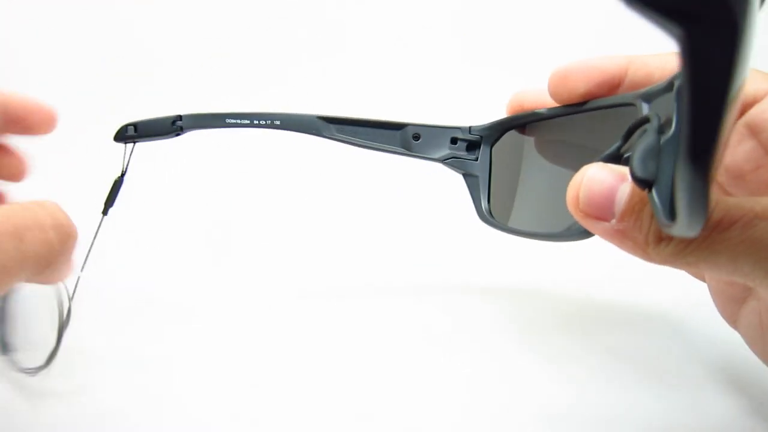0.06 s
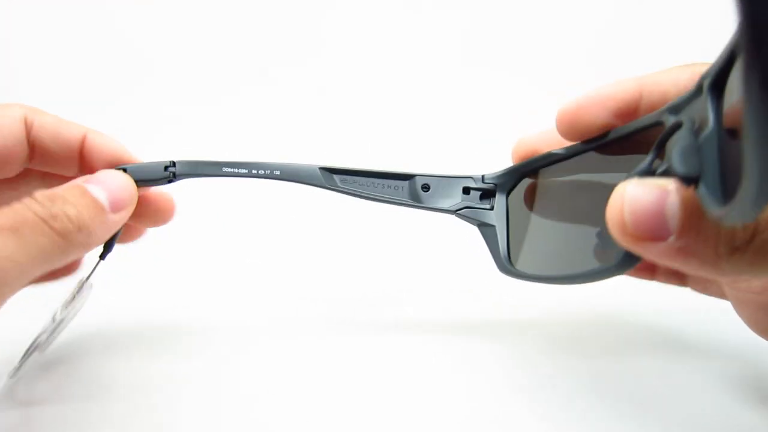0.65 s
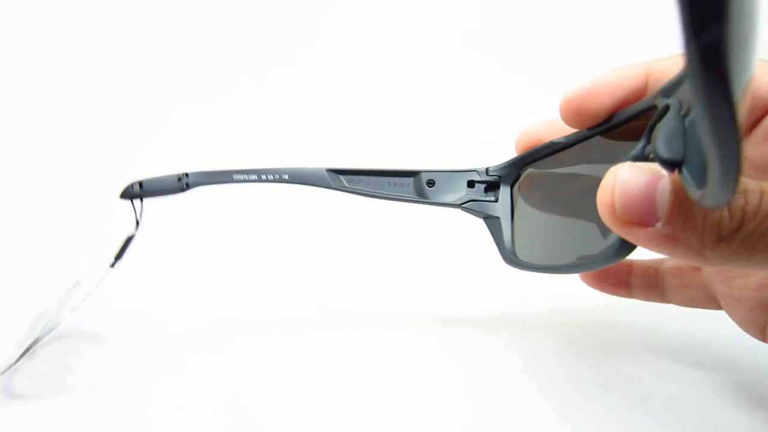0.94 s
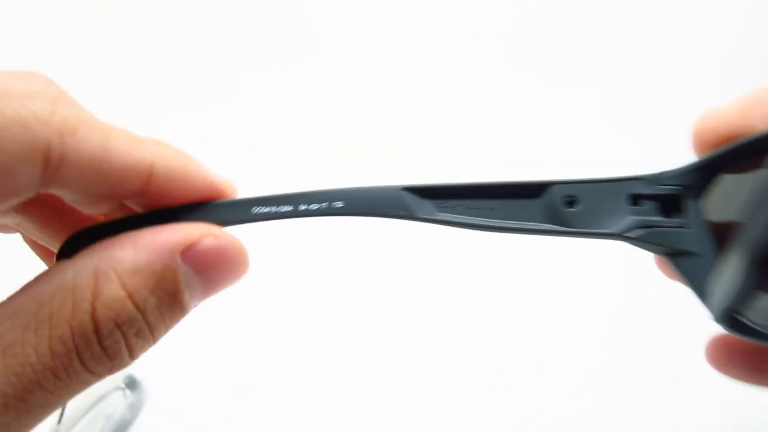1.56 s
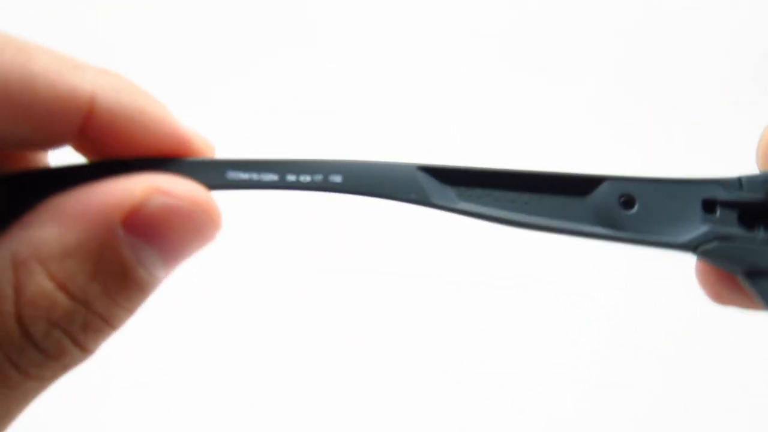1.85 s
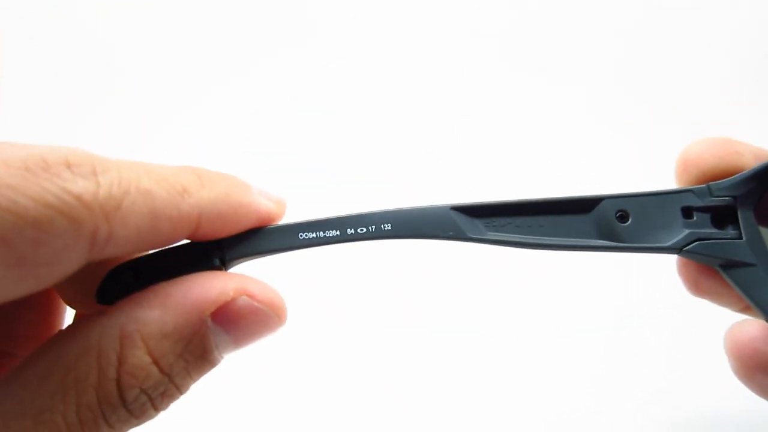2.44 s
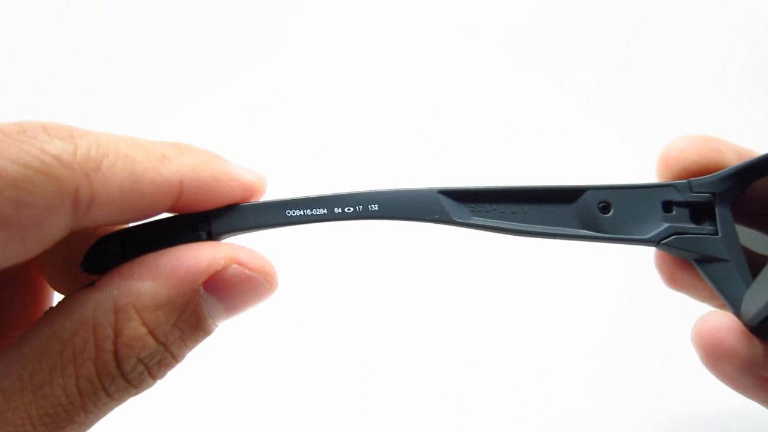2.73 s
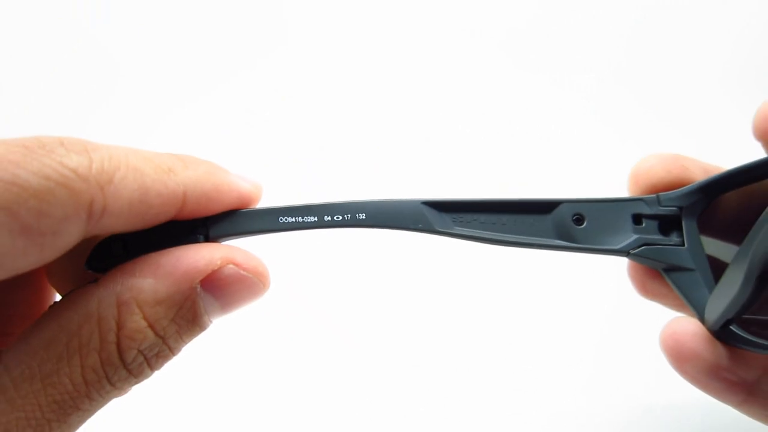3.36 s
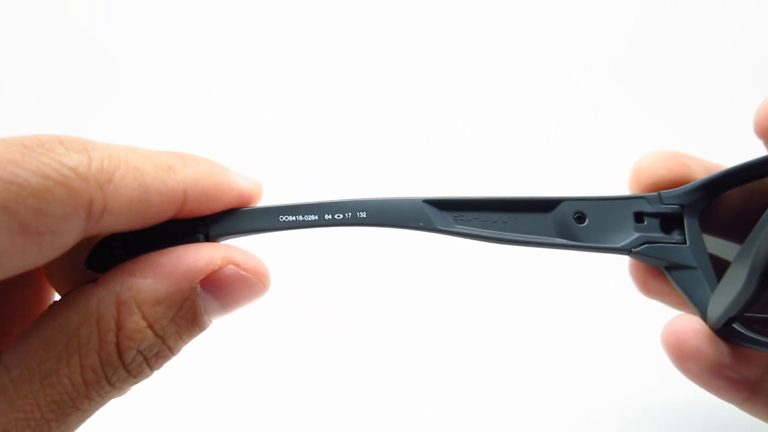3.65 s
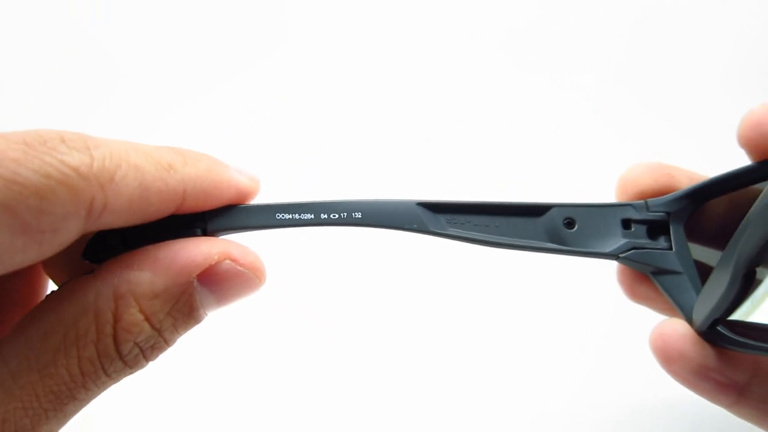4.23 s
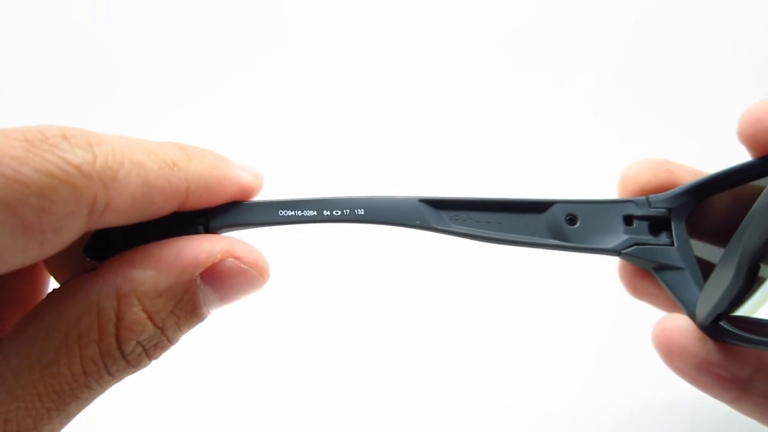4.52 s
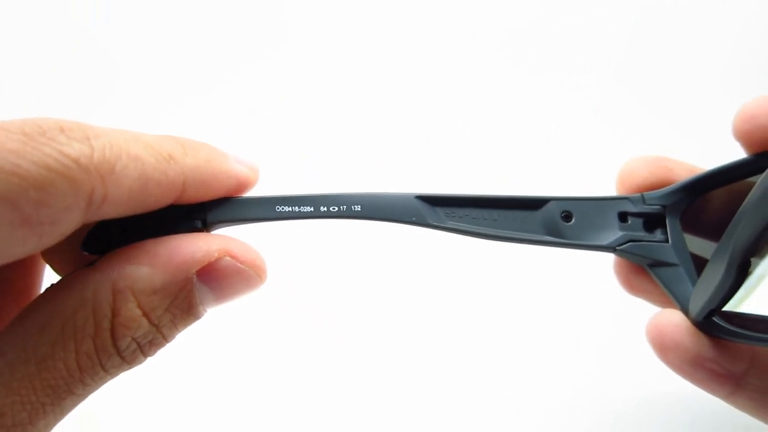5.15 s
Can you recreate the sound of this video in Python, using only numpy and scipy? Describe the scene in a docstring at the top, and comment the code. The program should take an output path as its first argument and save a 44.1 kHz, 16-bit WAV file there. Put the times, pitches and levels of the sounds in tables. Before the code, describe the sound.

In a quiet room with a low fan hum, fingers slide lightly over a pair of plastic sunglasses, very near the microphone, and the joints tick. Two loud, dry hits stand out: a bright hinge snap, then a hollower bump of the frame. Three quick clicks come next. After that the handling fades to an occasional faint tick while the briefly lowered room tone returns.

```python
"""Handling plastic sunglasses

Sunglasses turn in the fingers, close to a camera in a quiet room with a humming fan. Skin hisses
over the frame, the joints tick under strain, fingertips pat an arm, a hinge snaps and the frame
bumps the camera. Its gain control ducks at the snap and the bump, then lets the room swell back."""
import sys
import numpy as np
from scipy import signal
from scipy.fft import rfft, irfft, next_fast_len
from scipy.io import wavfile
from scipy.ndimage import uniform_filter1d

SR = 44100
rng = np.random.default_rng(int(sys.argv[2]) if len(sys.argv) > 2 else 0)


def master_out(mix):
    """Clip the mix to full scale and print it as 16-bit PCM to the path in sys.argv[1]."""
    frames = np.transpose(np.atleast_2d(mix))
    ceiling = np.clip(frames, -1, 1)
    pcm = np.round(ceiling * 32767).astype(np.int16)
    wavfile.write(sys.argv[1], SR, pcm)


N = 228645
TIME = np.arange(N) / SR
HZ = np.fft.rfftfreq(N, 1 / SR)
TURNING_DB, HOLDING_DB = -55.5, -73.5  # light skin contact: hands moving, hands still


def amp(db):
    """Decibels to gain."""
    return 10 ** (np.asarray(db) / 20)


def unit_rms(x):
    """Scales to rms 1."""
    return x / np.sqrt(np.mean(x ** 2) + 1e-20)


def unit_hit(x, size=220):
    """Scales a stereo hit so that its energy, packed into 5 ms, has rms 1."""
    return x / np.sqrt(np.sum(x ** 2) / (2 * size) + 1e-20)


def curve(points, hz):
    """Interpolates a table on a log-frequency axis."""
    f, value = np.transpose(points)
    return np.interp(np.log(hz + 1), np.log(f + 1), value)


def pan(db):
    """Stereo gains that put the left channel db above the right."""
    return amp(np.array([[db], [-db]]) / 2)


def add(mix, s, sound):
    """Mixes a stereo sound in at s seconds."""
    part = mix[:, round(s * SR):][:, :sound.shape[1]]
    part += sound[:, :part.shape[1]]


def stereo_noise(correlation, size):
    """White noise, partly shared by the two channels."""
    shared, left, right = rng.standard_normal((3, size))
    return np.sqrt(correlation) * shared + np.sqrt(1 - correlation) * np.array([left, right])


def drift(rate_hz):
    """Smooth random modulation, rms 1."""
    return unit_rms(irfft(rfft(rng.standard_normal(N)) * np.exp(-(HZ / rate_hz) ** 2), N))


def resonance(hz, width_hz, correlation, size):
    """Noise ringing in one resonance, rms 1."""
    f = np.fft.rfftfreq(size, 1 / SR)
    spectrum = rfft(stereo_noise(correlation, size))
    return unit_rms(irfft(spectrum / (1 + ((f - hz) / width_hz) ** 2), size))


def crack(low_hz, high_hz, decay_s, correlation, size=3000):
    """Dense, quickly damped plastic modes, voiced as a band of decaying noise."""
    t = np.arange(size) / SR
    burst = stereo_noise(correlation, size) * np.exp(-t / decay_s)
    burst = signal.sosfilt(signal.butter(2, low_hz, "high", fs=SR, output="sos"), burst)
    return unit_hit(signal.sosfilt(signal.butter(4, high_hz, fs=SR, output="sos"), burst))


def room_tone(air_db=-43.5, waver_rad=0.22):
    """A bed of moving air under a fan's hum, part steady tone and part turbulence."""
    # colour of the air: f/Hz, relative level/dB
    air_colour = [(20, -27), (40, -12.5), (62, -9), (140, 1), (195, -3), (275, -0.5), (330, -6), (650, -10),
                  (1000, -9), (2000, -18), (4000, -23), (9000, -29), (12500, -35), (15500, -42.5)]
    # stereo image of the air: f/Hz, correlation/0-1
    air_image = [(40, 0.2), (120, 0), (220, 0), (500, 0), (1000, 0), (3000, 0.06), (12000, 0.15)]
    # fan tones and duct resonances: f/Hz, width/Hz, level/dB, pan/dB, steady share/0-1
    fan_tones = [(124, 1.3, -62, 7.5, .6), (207.6, 2.5, -50, -0.5, 0.91), (242.7, 32, -51.5, -1, 0.71),
                 (893.4, 27, -54, -16, 0), (1210, 71, -64.5, -11.5, 0.04), (1805, 6.5, -62.5, -29, .4)]
    left, other = rfft(rng.standard_normal((2, N)))
    correlation = curve(air_image, HZ)
    air = np.array([left, correlation * left + np.sqrt(1 - correlation ** 2) * other])
    out = amp(air_db) * unit_rms(irfft(air * amp(curve(air_colour, HZ)), N))
    wander = waver_rad * drift(2)
    for hz, width_hz, db, pan_db, steady in fan_tones:
        tone = np.sqrt(2 * steady) * np.sin(2 * np.pi * (hz * TIME + rng.random()) + wander)
        turbulence = np.sqrt(1 - steady) * resonance(hz, width_hz, 0.96, next_fast_len(N))[:, :N]
        out += amp(db) * unit_rms((tone + turbulence) * pan(pan_db))
    return out


def rubbing(settle_at_s=2, settle_length_s=0.37, taper_share=0.88):
    """Friction envelope: separate strokes over a light contact that eases as the hands settle."""
    # finger strokes, each swelling and fading evenly: centre t/s, length/s, level/dB
    strokes = [(0.012, 0.14, -44.5), (0.157, 0.067, -41), (0.266, 0.133, -45.5), (0.373, .05, -49.5),
               (0.494, .1, -47), (0.667, .08, -47), (0.826, 0.19, -44.5), (1.02, .06, -49),
               (1.223, 0.19, -48.5), (1.471, 0.37, -39.5), (1.574, 0.14, -38.5), (1.701, 0.18, -37),
               (1.813, 0.079, -46.5), (2.025, 0.054, -49.5), (2.083, 0.074, -51), (2.21, 0.13, -46),
               (2.717, .04, -56), (3.178, .12, -60), (4.223, 0.1, -49.5), (4.315, 0.13, -55)]
    settled = np.clip((TIME - settle_at_s) / settle_length_s + .5, 0, 1)
    power = amp(TURNING_DB + (HOLDING_DB - TURNING_DB) * settled) ** 2
    for s, length, db in strokes:
        swell = np.clip((1 - 2 * abs(TIME - s) / length) / taper_share, 0, 1)
        power += (amp(db) * np.sin(np.pi / 2 * swell)) ** 2
    return np.sqrt(power)


def skin_slide(grain_db=3, grains_per_s=3500, grain_share=0.033, flutter_db=2.0, patch_db=3.0):
    """Skin ridges catch and slip: a grainy hiss whose colour shifts as the contact moves."""
    # colour of sliding skin: f/Hz, relative level/dB
    skin_colour = [(200, -16.5), (700, -4), (1500, 6), (3000, 6.5), (5000, 7), (7000, 5), (10000, 3.5),
                   (12000, 4), (13500, -1.5), (15500, -13.5)]
    grain_gains = amp(grain_db * np.minimum(rng.exponential(1, N), 5))
    grains = grain_gains * (rng.random(N) < grains_per_s / SR)
    smooth = np.sqrt(1 - grain_share) * stereo_noise(0.58, N)
    gritty = np.sqrt(grain_share) * unit_rms(grains * stereo_noise(0.92, N))
    hz, _, spectra = signal.stft(smooth + gritty, SR, nperseg=512)
    patches = uniform_filter1d(rng.standard_normal(spectra.shape[1:]), size=5, axis=0)
    patches = unit_rms(uniform_filter1d(patches, size=6, axis=1))
    colour = amp(curve(skin_colour, hz)[:, None] + patch_db * patches)
    hiss = unit_rms(signal.istft(spectra * colour, SR, nperseg=512)[1][:, :N])
    return hiss * rubbing() * amp(flutter_db * drift(35))


def faint_ticks(still_per_s=3, still_db=-59, spread_db=2, band_hz=(2000, 8950), decay_s=.0025):
    """Cues for tiny random slips, denser and louder the harder the fingers rub."""
    effort_db = 20 * np.log10(rubbing()) - HOLDING_DB
    slips = rng.random(N) < (still_per_s + .5 * effort_db) / SR
    levels = still_db + 0.43 * effort_db + spread_db * rng.standard_normal(N)
    return [(s, db, *band_hz, decay_s) for s, db in zip(TIME[slips], levels[slips])]


def ticks(echo_s=.00265, echo_db=-7.5):
    """Small slips ring the joints, each with a tight reflection off the table top."""
    # joint and fingernail ticks: t/s, level/dB, low cut/Hz, high cut/Hz, decay/s
    cues = [(0.0102, -40.5, 300, 6260, 0.001), (0.1387, -31.5, 200, 6300, 0.0033),
            (0.2056, -37.5, 200, 9900, 0.0043), (.543, -47.5, 9100, 14000, 0.0031),
            (.6595, -38.5, 990, 4500, 0.0022), (0.678, -46.5, 2500, 7000, 0.0029),
            (0.8863, -33.5, 497, 4470, 0.0034), (0.915, -39.5, 1400, 4120, 0.0026),
            (0.984, -41, 2500, 5400, 0.006), (1.6222, -33.5, 1960, 3740, 0.00089),
            (1.6595, -36, 2490, 11800, 0.0032), (2.151, -20.5, 402, 13000, 0.0032),
            (2.2146, -24.5, 350, 11430, 0.0056), (2.2831, -17, 2330, 13700, 0.0029),
            (2.9507, -35.5, 200, 1295, 0.0014), (4.001, -49, 3000, 8900, .004),
            (4.4966, -52, 2980, 10800, 0.0093), (4.75, -52, 2000, 6950, 0.0019)]
    # joint resonances: f/Hz, width/Hz, gain/dB
    joint_modes = [(1590, 210, -8), (3050, 230, -11.5), (3740, 180, -11.5), (5060, 540, -10),
                   (6600, 340, -7), (8060, 370, -4.5), (8900, 640, -12), (12000, 210, -17)]
    out = np.zeros((2, N))
    for s, db, low_hz, high_hz, decay_s in cues + faint_ticks():
        slip = crack(low_hz, high_hz, decay_s, correlation=0.78)
        ring = sum(amp(gain_db) * signal.lfilter(*signal.iirpeak(hz, hz / width_hz, SR), slip)
                   for hz, width_hz, gain_db in joint_modes)
        tick = amp(db) * unit_hit(slip + ring) * pan(1.5)
        add(out, s, tick)
        add(out, s + echo_s, amp(echo_db) * tick)
    return out


def pats():
    """Soft fingertips land on the arm with a dull, low knock."""
    # fingertip landings: t/s, level/dB
    landings = [(0.262, -37.5), (0.283, -43)]
    out = np.zeros((2, N))
    for s, db in landings:
        add(out, s, amp(db) * crack(low_hz=250, high_hz=550, decay_s=0.004, correlation=0.86))
    return out


def rasps(width_at_1khz=40):
    """Skin catches and draws a resonance from the frame, its pitch set by the grip."""
    # skin catches: centre t/s, length/s, level/dB, f/Hz
    catches = [(0.528, 0.3, -53, 2200), (.55, 0.43, -52.5, 1105), (0.803, 0.11, -47, 6860),
               (0.82, 0.093, -47, 11700), (0.919, 0.067, -43.5, 1780), (1.048, 0.38, -52.5, 1775),
               (1.707, 0.065, -36, 7150), (1.784, 0.029, -41.5, 8800), (2.018, 0.029, -45, 6600),
               (4.22, 0.07, -50.5, 5000), (4.228, 0.065, -57, 3250)]
    out = np.zeros((2, N))
    for s, length, db, hz in catches:
        size = round(length * SR)
        width_hz = width_at_1khz * (hz / 1000) ** 1.55  # higher resonances are damped more
        rasp = signal.windows.tukey(size, .5) * resonance(hz, width_hz, 0.21, SR)[:, :size]
        add(out, s - length / 2, amp(db) * rasp)
    return out


def strike(hits, modes, rise_s, crack_low_hz, crack_decay_s, right_lead_rad):
    """Each hit cracks and rings the part; its modes reach the two microphones out of step."""
    t, out = np.arange(SR // 2) / SR, np.zeros((2, N))
    lead = np.array([[0], [right_lead_rad]])
    ring = sum(pan(pan_db) * amp(db - 60 * t / t60) * np.sin(2 * np.pi * hz * t + lead)
               for hz, db, t60, pan_db in modes)
    ring = unit_hit(ring * (1 - np.exp(-t / rise_s)))
    for s, db, crack_db, top_hz in hits:
        add(out, s, amp(db) * ring)
        add(out, s, amp(db + crack_db) * crack(crack_low_hz, top_hz, crack_decay_s, correlation=0.65))
    return out


def hinge_snap():
    """The hinge snaps over, ringing the plastic arm; a fainter second hit follows 2.6 ms later."""
    # snap and a second hit 2.6 ms later: t/s, ring level/dB, crack over ring/dB, crack high cut/Hz
    hits = [(1.2351, -0.9, -9, 14430), (1.23773, -18.5, 3, 6980)]
    # modes of the arm: f/Hz, relative level/dB, t60/s, pan/dB
    modes = [(342, -24, 0.02, -2), (737, -33, 0.095, 3.5), (1623, -15, 0.02, -0.5), (2270, 1, 0.012, 5),
             (2326, -23.5, 0.072, 3.5), (2870, -15, 0.019, -1), (3940, -12.5, 0.015, 1.5),
             (4600, -16.5, 0.017, 8), (5310, -8.5, 0.0082, 4.5), (12700, -7, 0.00534, 1)]
    return strike(hits, modes, rise_s=0.00091, crack_low_hz=2000, crack_decay_s=.0022,
                  right_lead_rad=0.23)


def camera_bump():
    """The frame knocks against the camera body and rebounds."""
    # bump and rebounds: t/s, ring level/dB, crack over ring/dB, crack high cut/Hz
    hits = [(1.7272, -1, -13, 3940), (1.7281, 4, -24, 12800), (1.7506, -14, -3, 3750),
            (1.7535, -24, -1, 2500), (1.757, -21.5, -11, 3030)]
    # modes of frame and camera body: f/Hz, relative level/dB, t60/s, pan/dB
    modes = [(153, -16.5, 0.062, -4), (409, -3.5, 0.054, -1), (438, -46, 0.94, -19), (610, -15, 0.034, -21),
             (796, 13, 0.0094, -13.5), (1040, -13, 0.011, -6), (1075, -15.5, 0.039, -7),
             (1630, 2, 0.011, -21.5), (3600, -16, 0.017, 5), (5900, -2, 0.0054, 14)]
    return strike(hits, modes, rise_s=0.0012, crack_low_hz=900, crack_decay_s=.0006,
                  right_lead_rad=1.17)


def room_reverb(send, near_db=-13, near_decay_s=0.012, tail_db=-22):
    """Quick scatter off nearby surfaces, then a faint, short tail."""
    # decay of the room: f/Hz, t60/s
    decay_times = [(200, .2), (1000, 0.082), (3000, 0.18), (8000, 0.16), (15000, .08)]
    hz, t, spectra = signal.stft(rng.standard_normal((2, SR // 3)), SR, nperseg=256)
    fade = amp(-60 * t / curve(decay_times, hz)[:, None])
    tail = signal.istft(spectra * fade, SR, nperseg=256)[1]
    near = rng.standard_normal(tail.shape) * np.exp(-np.arange(tail.shape[1]) / SR / near_decay_s)
    response = amp(near_db) * near / np.linalg.norm(near[0])
    response += amp(tail_db) * tail / np.linalg.norm(tail[0])
    response = np.pad(response, ((0, 0), (SR // 200, 0)))  # 5 ms pre-delay
    return signal.fftconvolve(send, response, axes=1)[:, :N]


def scene():
    """Close handling, snap and bump with a touch of reverb, over the room tone."""
    bed, snap, bump = room_tone(), hinge_snap(), camera_bump()
    handling = (skin_slide() + rasps()) * pan(1.1) + pats() + ticks()
    low_cut = signal.butter(2, 80, "high", fs=SR, output="sos")  # the microphones roll off the deep bass
    snap, bump, handling = signal.sosfilt(low_cut, [snap, bump, handling])
    # the bump stays drier: it reaches the microphones mostly through the camera body
    send = handling + amp(0.5) * snap + amp(-10.5) * bump
    return snap + bump + handling + room_reverb(send) + bed


def record(dry, limit_db=-16.0, recovery_db_per_s=4.0, high_cut_hz=16200):
    """Gain control clamps down at once on loud hits and releases slowly; a high cut follows."""
    power_db = 10 * np.log10(abs(uniform_filter1d((dry ** 2).mean(0), size=220)) + 1e-12)
    recovery = recovery_db_per_s * TIME
    held_db = np.maximum.accumulate(power_db + recovery) - recovery
    ducked = dry / amp(np.maximum(held_db - limit_db, 0))
    high_cut = signal.firwin(255, high_cut_hz, window=("kaiser", 9), fs=SR)
    return signal.oaconvolve(ducked, high_cut[None], "same", axes=1)


dry = scene()
out = record(dry)
master_out(out)
```